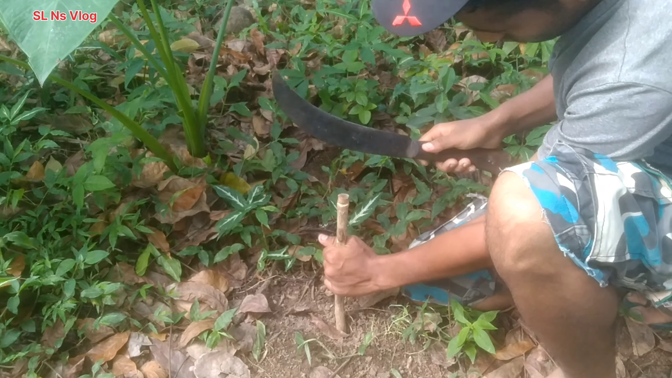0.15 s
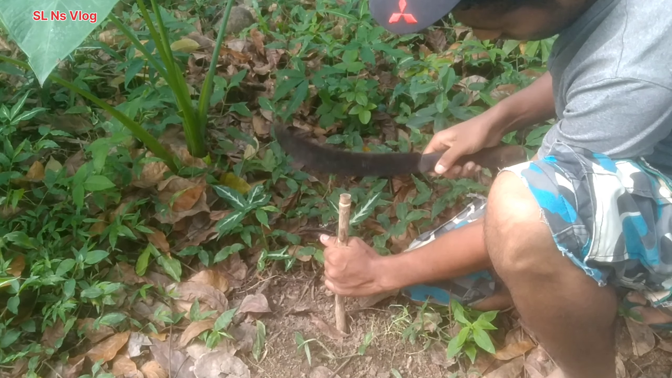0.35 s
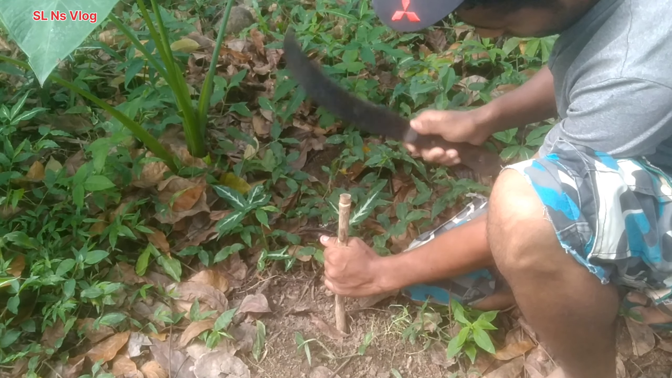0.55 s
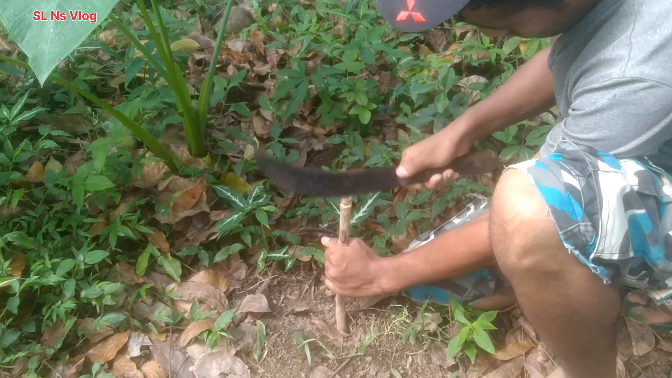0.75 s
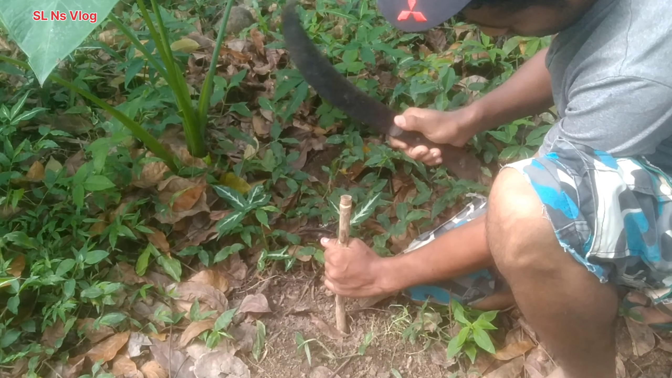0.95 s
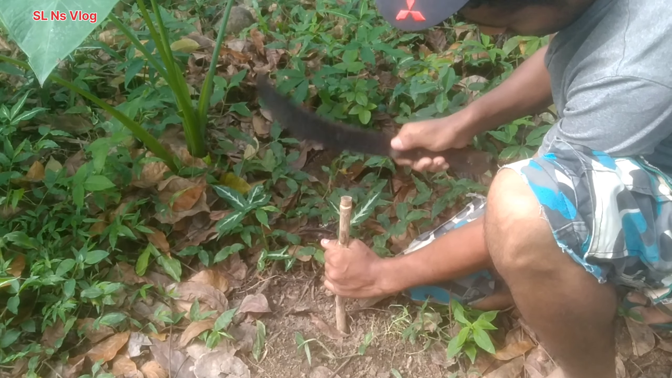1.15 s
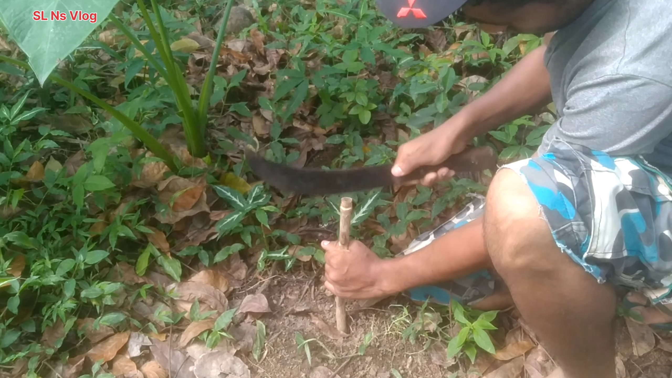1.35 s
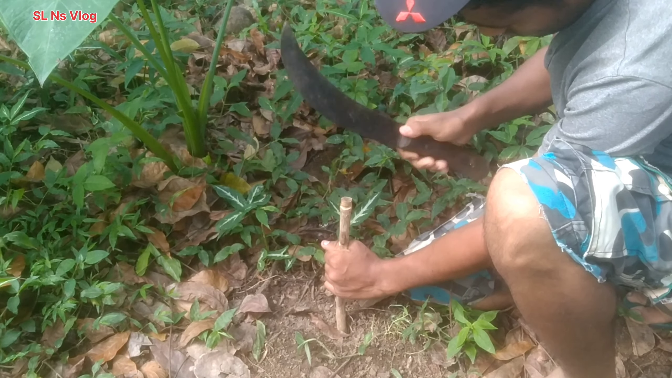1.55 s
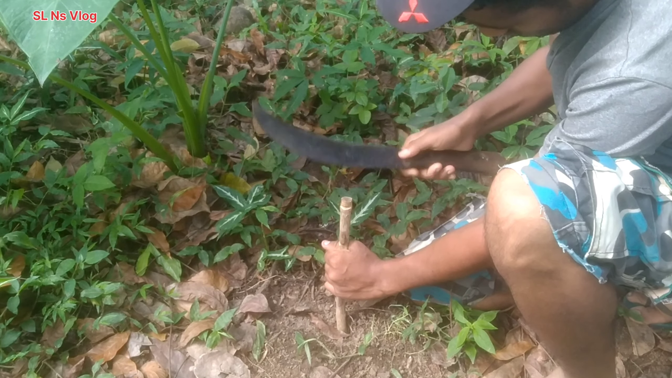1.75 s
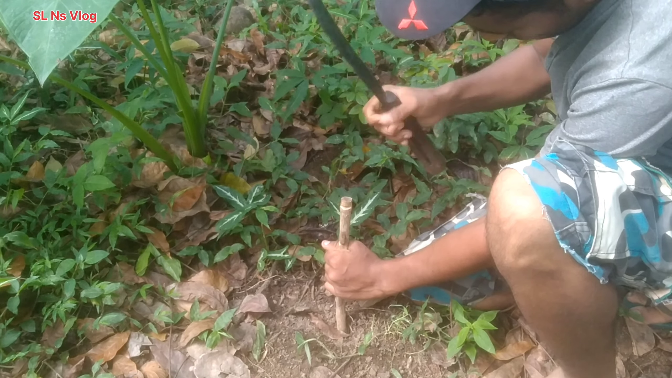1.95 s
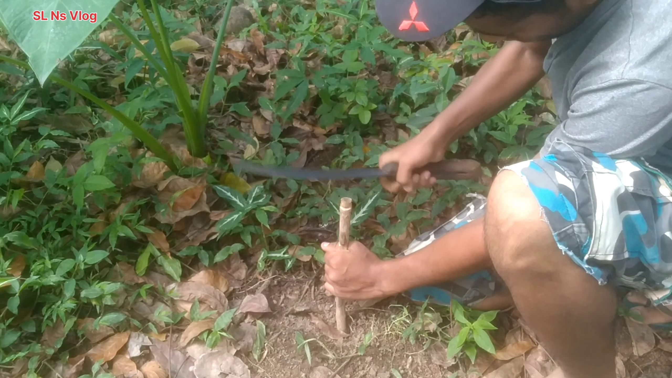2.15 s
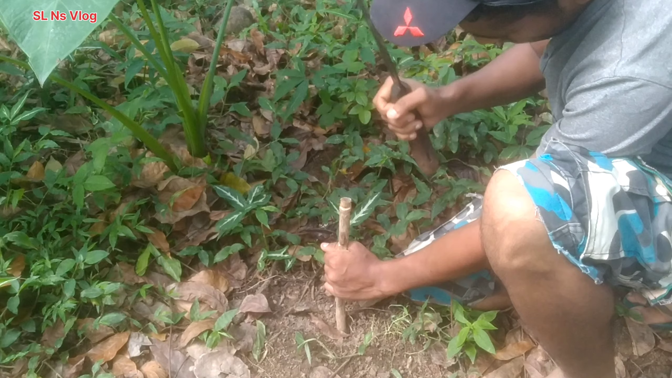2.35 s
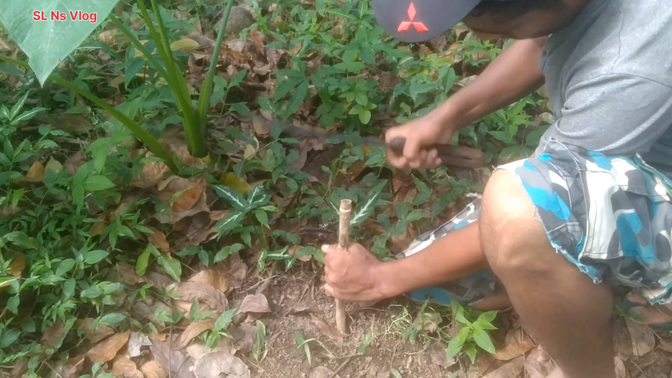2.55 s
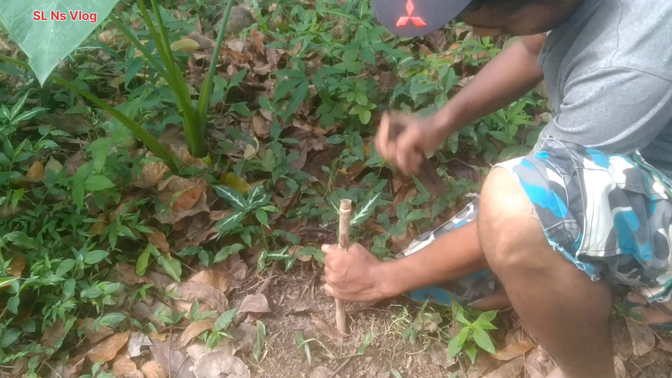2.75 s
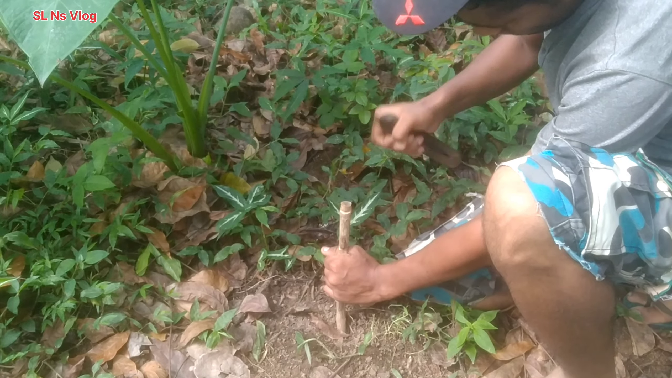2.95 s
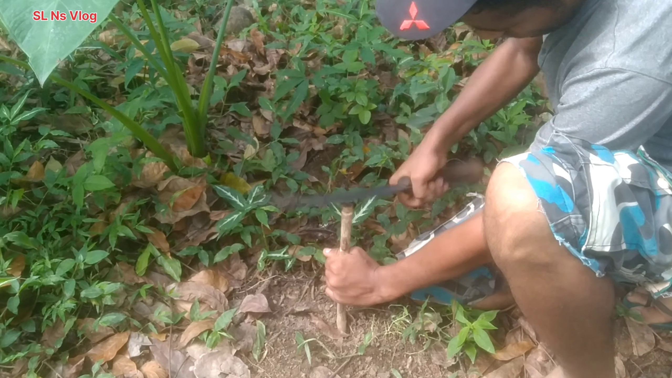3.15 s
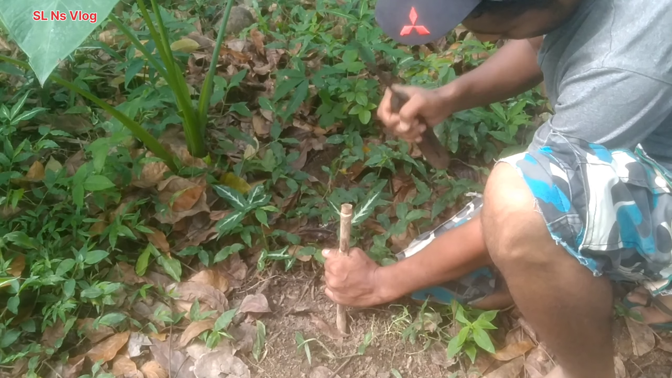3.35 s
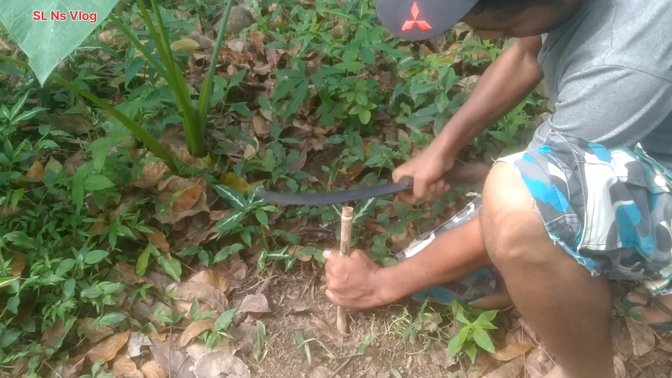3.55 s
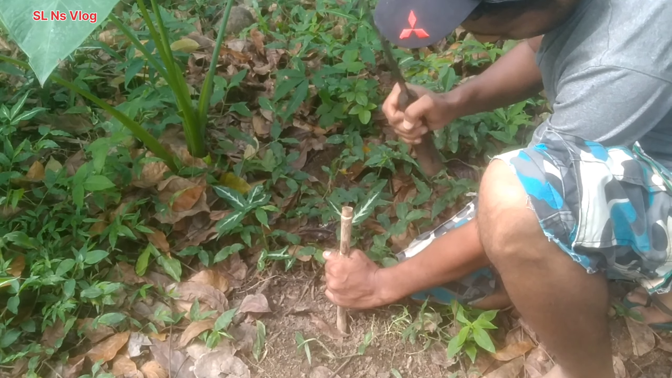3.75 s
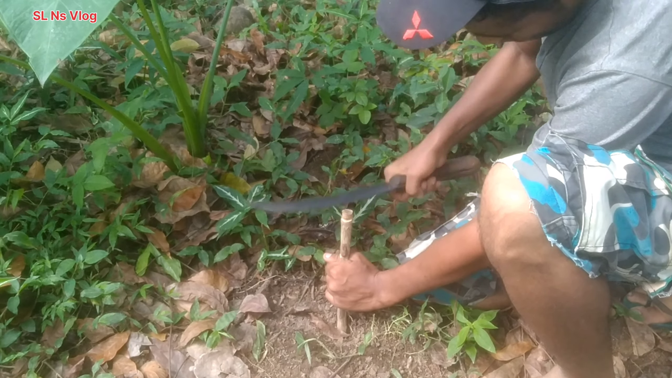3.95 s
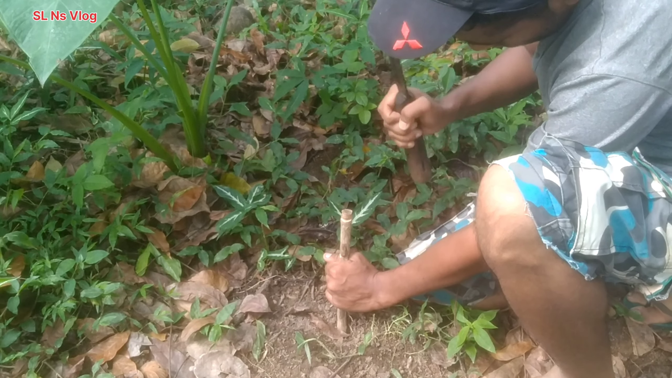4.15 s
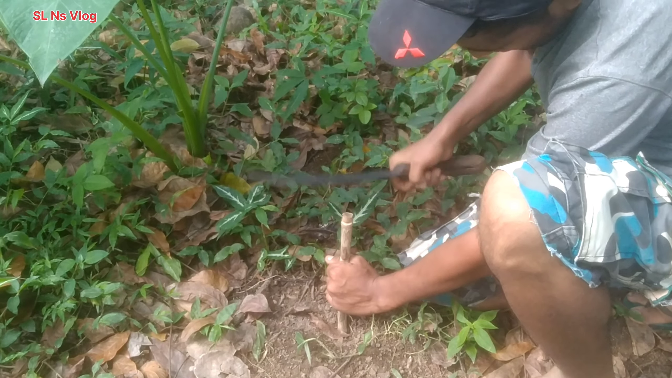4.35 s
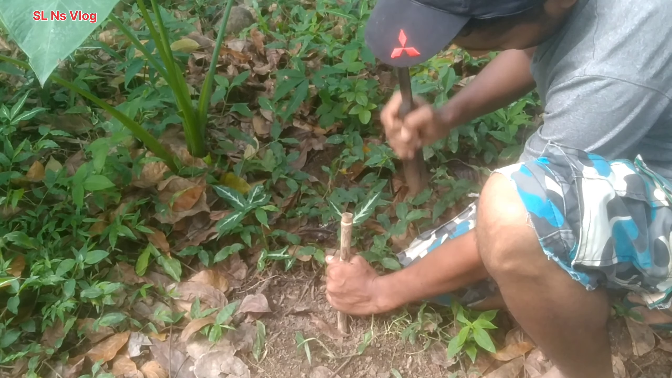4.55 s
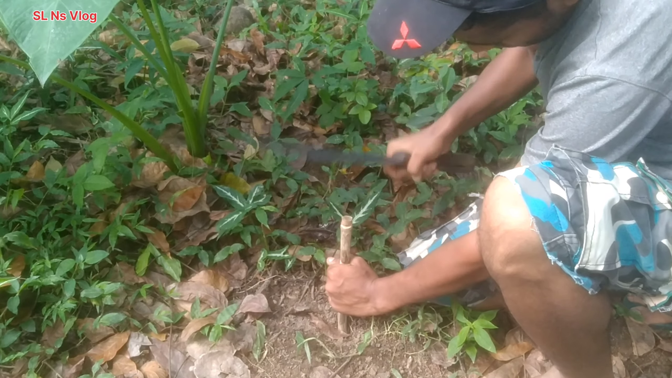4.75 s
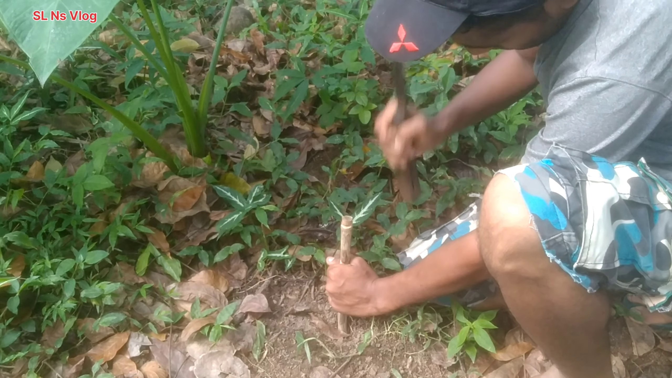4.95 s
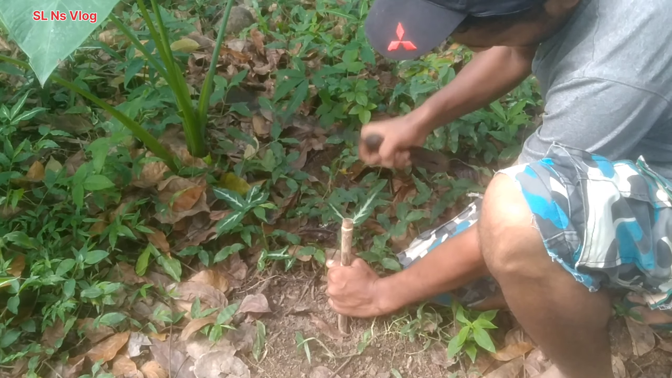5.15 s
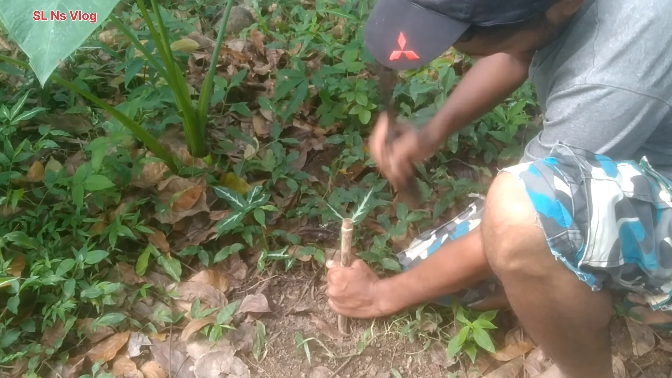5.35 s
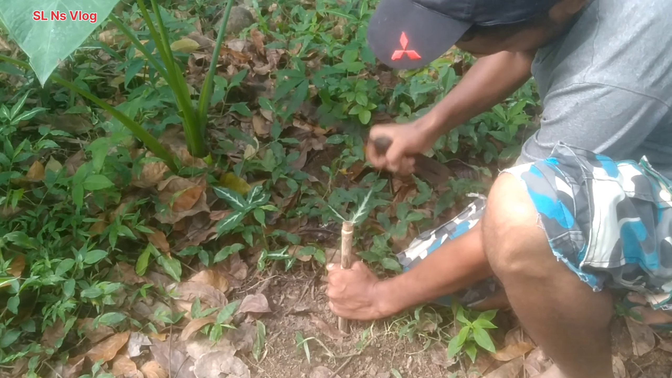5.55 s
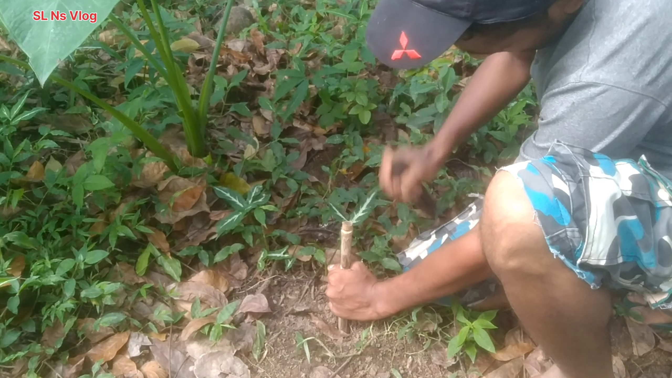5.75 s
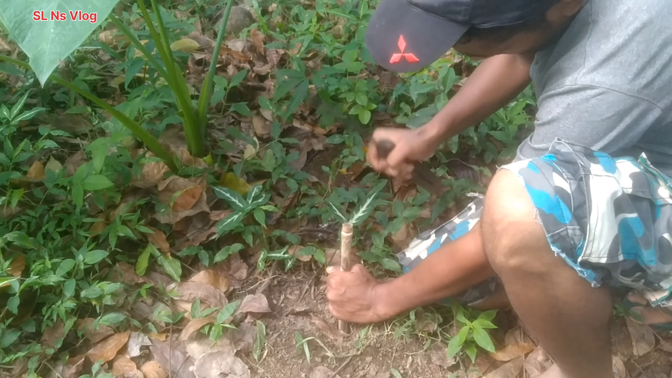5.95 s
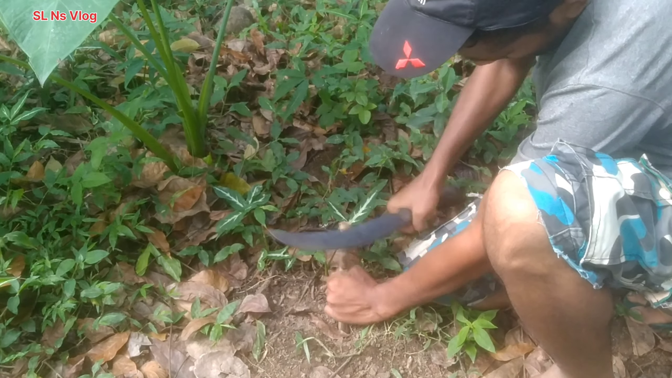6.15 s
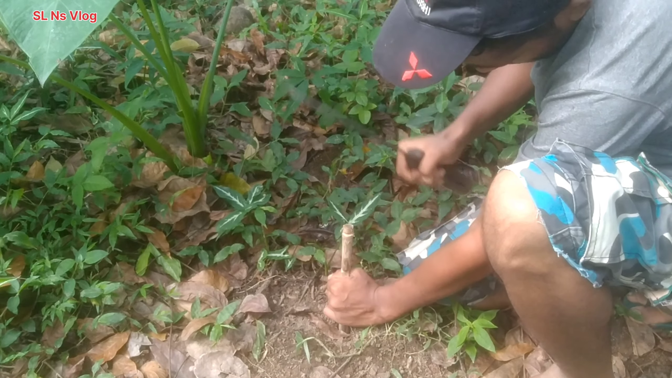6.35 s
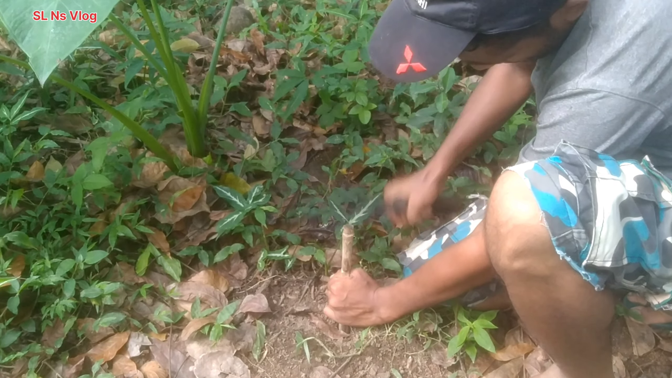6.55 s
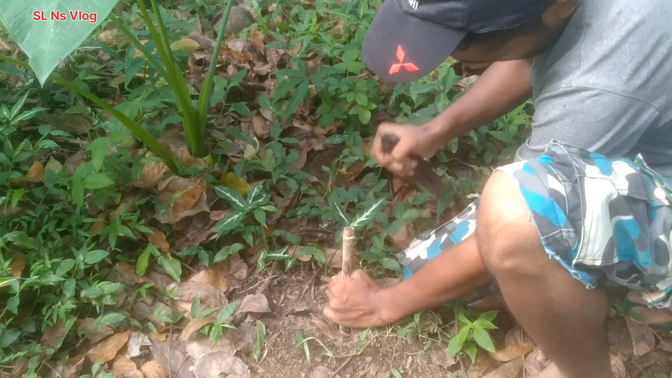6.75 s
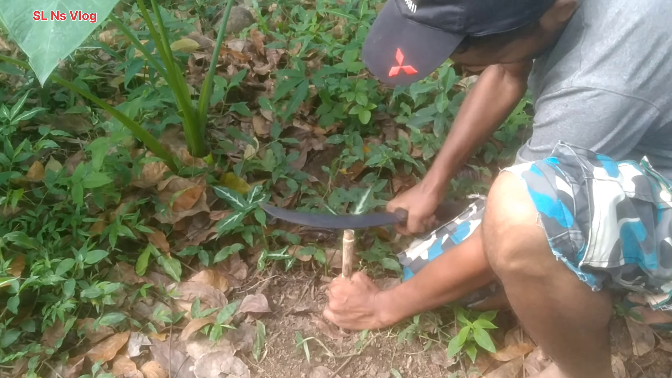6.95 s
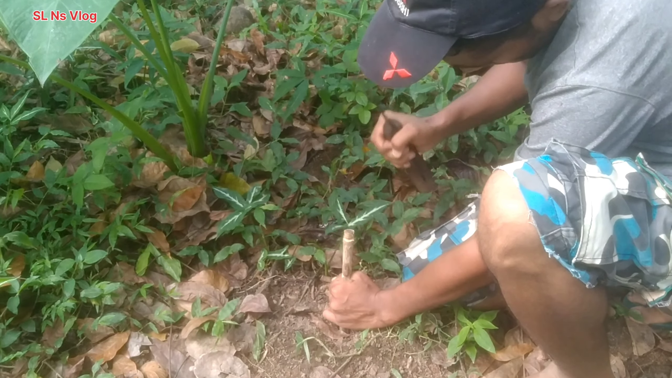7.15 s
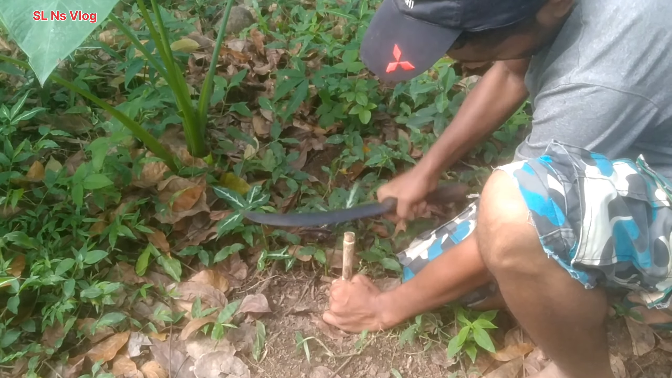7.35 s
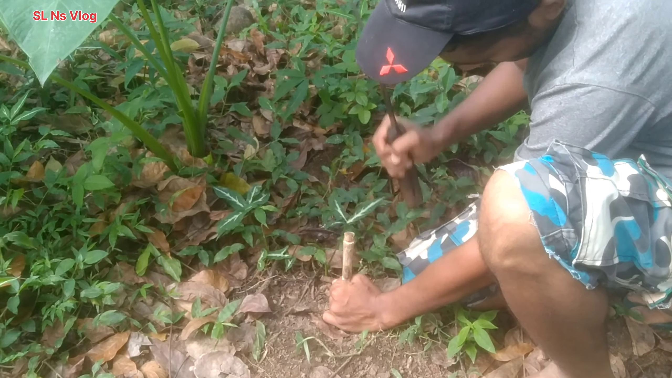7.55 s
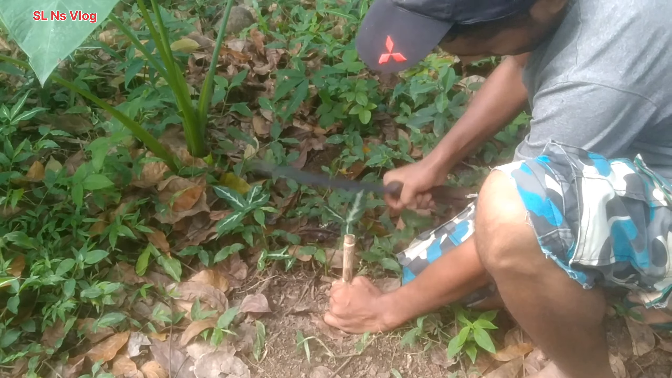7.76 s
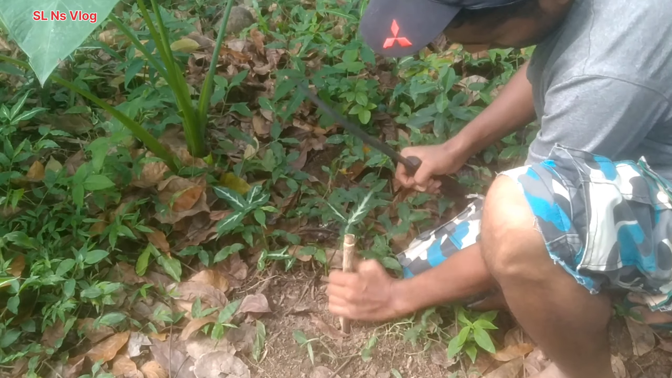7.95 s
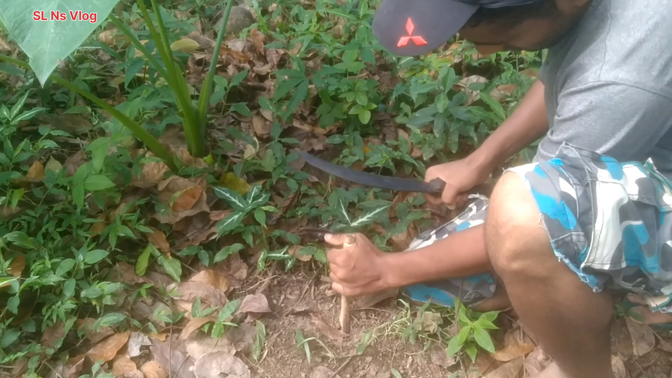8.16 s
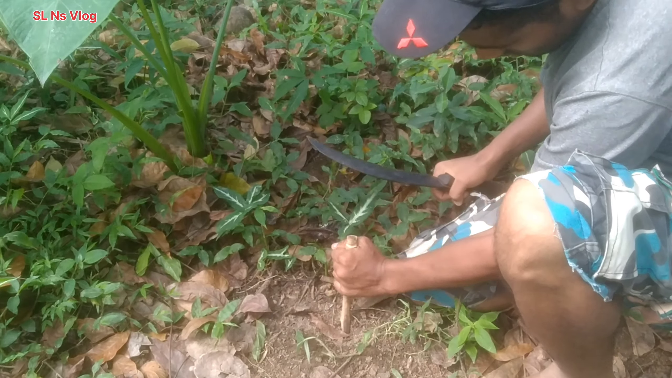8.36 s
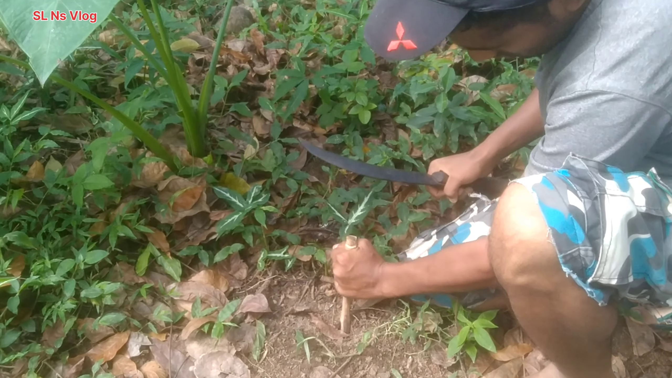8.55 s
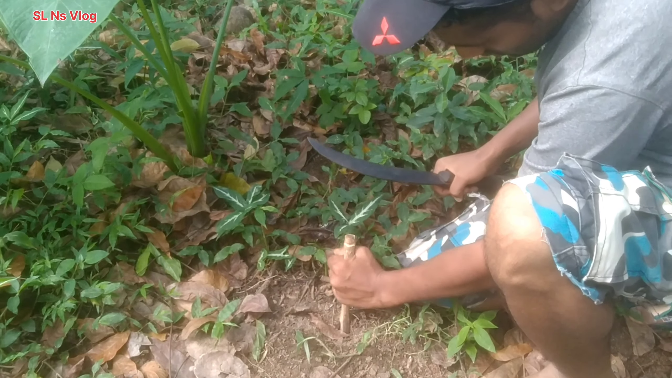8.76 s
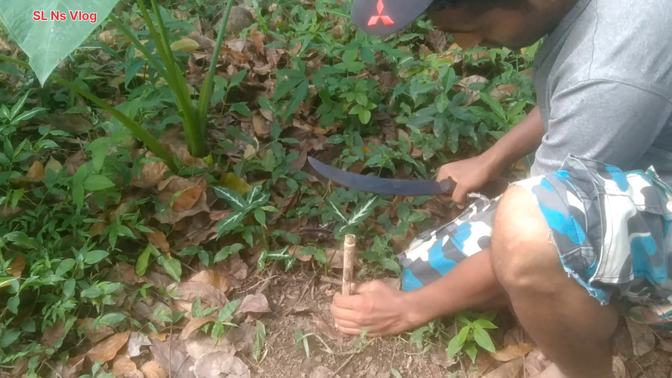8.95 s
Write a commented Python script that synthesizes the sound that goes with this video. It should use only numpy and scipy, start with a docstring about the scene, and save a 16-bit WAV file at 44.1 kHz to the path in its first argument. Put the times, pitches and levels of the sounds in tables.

```python
"""Hiss over low rumble, with a few dry ticks; then the flat of a machete drives a thin stake into forest soil.
Three light taps come first, then sixteen full blows; the rumble is stronger while the arm swings.
Each blow cracks in the wood (noise bursts through resonances), thumps the ground (one pressure pull) and
rings the blade (decaying sines); leaves and trunks scatter it back as decaying bands of noise.
Strong bass peaks duck the recorder's gain for a moment, so the forest's answer swells when it recovers."""
import sys
import numpy as np
from scipy import signal
from scipy.fft import rfft, irfft
from scipy.io import wavfile
from scipy.ndimage import uniform_filter1d, minimum_filter1d

SR = 44100
rng = np.random.default_rng(int(sys.argv[2]) if len(sys.argv) > 2 else 0)


def store_wav(level_fs):
    """Save 16-bit WAV to argv[1]."""
    pcm = np.round(np.clip(np.atleast_2d(level_fs), -1, 1) * 32767)
    wavfile.write(sys.argv[1], SR, pcm.T.astype(np.int16))


N = 400869

# Blows. Each row: start in seconds, force of the swing in dB, level of the direct wood crack in dB
# re what the force gives, sinking of the stake in dB, ring of the blade in dB, pitch of the struck spot in Hz.
BLOW_ROWS = [(0.8462, -14, 2.5, -38, -28, 2200), (1.1441, -18, .5, -41, -39, 1780),
             (1.424, -16, 1.5, -42, -27, 2200), (2.1934, -4.5, -2, -19, -3, 2140),
             (2.5567, 0, 4.5, -3.5, 1, 2460), (2.8964, 0, 5, -4, -7, 2460), (3.2448, 0, -.5, 0, -10, 2530),
             (3.6036, 0, 2.5, -4, 0, 1720), (3.971, 0, 2, -5, -4, 2655), (4.3551, 0, .5, -7.5, -10, 2980),
             (4.726, .5, -.5, -.5, -13, 2850), (5.1119, 0, -.5, -6.5, -8, 2090),
             (5.497, .5, -5.5, -4, -10, 2380), (5.8868, -.5, -1, -6, -4, 2430),
             (6.251, .5, 1, -1, -11, 2640), (6.6647, -.5, 1, -9, 1, 2420), (7.0331, 0, 1.5, -8, 1.5, 2637),
             (7.3865, 1, -7, -11.5, -1, 2460), (7.7266, .5, .5, -3.5, 3, 2400)]
# Where thud, knock, crack and snap of the wood sit, in Hz.
WOOD_COLOUR_HZ = [350, 1350, 3000, 7500]
# Thud, knock, crack and snap; a harder swing is brighter.
# Each row: level at full force in dB, slope in dB per dB of force.
WOOD_RULE = [(11, .4), (14.8, 1.05), (16.3, 1.08), (8.6, 1.55)]


def from_db(db):
    """Decibels to amplitude gain."""
    return 10 ** (np.asarray(db) / 20)


def unit_energy(x):
    """Scale to the energy of a click of height 1."""
    return x / np.sqrt(np.sum(x ** 2) + 1e-20)


def at_hz(hz, points_hz, values):
    """Interpolate values along a log-frequency axis."""
    return np.interp(np.log(hz), np.log(points_hz), values)


def follow(rule, control_db):
    """Levels in dB that each follow one control with a slope of their own."""
    full_db, slope = np.transpose(rule)
    return full_db + slope * control_db


def butter(x, hz, kind, order=2):
    """Causal Butterworth filter."""
    sos = signal.butter(order, hz, kind, fs=SR, output="sos")
    return signal.sosfilt(sos, x)


def resonate(x, hz, width_hz):
    """One two-pole resonance with gain 1 on top."""
    r = np.exp(-np.pi * width_hz / SR)
    zeros = np.array([1, 0, -1]) * (1 - r * r) / 2
    poles = [1, -2 * r * np.cos(2 * np.pi * hz / SR), r * r]
    return signal.lfilter(zeros, poles, x)


def narrow_noise(count, hz, width_hz):
    """A blurred tone of rms 1: noise through the same resonance twice."""
    once = resonate(rng.standard_normal(count), hz, width_hz)
    blur = resonate(once, hz, width_hz)
    return blur / blur.std()


def fade(t, t60_s):
    """Exponential decay, 60 dB down after t60_s."""
    return np.exp(-np.log(1000) * t / t60_s)


def add(track, start_s, sound):
    """Mix a sound into the track, cut at the track's end."""
    at = int(start_s * SR)
    track[at:at + len(sound)] += sound[:len(track) - at]


def background(rumble_hz=70):
    """Still air and microphone hiss as shaped noise; low rumble of air stirred by the swinging arm."""
    # Each row: frequency in Hz, level in dB re white noise of rms 1.
    floor_points = [(20, -36), (48, -34), (80, -45), (170, -56), (280, -68), (700, -67), (1800, -72),
                    (4000, -80), (5700, -83), (6900, -67), (8300, -86), (10000, -75), (11500, -85),
                    (15500, -80)]
    # Each row: time in seconds, rms of the rumble in dB.
    stirred_points = [(1.9, -75), (2.5, -58), (7.9, -59.5), (8.5, -76.5)]
    hz = np.maximum(np.fft.rfftfreq(N, 1 / SR), 1)
    floor_gain = from_db(at_hz(hz, *np.transpose(floor_points)))
    still = irfft(rfft(rng.standard_normal(N)) * floor_gain, N)
    rumble = butter(rng.standard_normal(N), rumble_hz, "low")
    rumble_db = np.interp(np.arange(N) / SR, *np.transpose(stirred_points))
    return still + from_db(rumble_db) * rumble / rumble.std()


def crush(t, rise_s=0.00013, t60_s=0.012):
    """Fibres give way in tiny fractures: a noise burst a few milliseconds long, of unit energy."""
    envelope = (1 - np.exp(-t / rise_s)) * fade(t, t60_s) + 1e-18
    return unit_energy(rng.standard_normal(len(t)) * envelope)


def litter(width_hz=4500):
    """Faint snaps, as of dry leaves: short bursts through one broad resonance."""
    # Each row: start in seconds, level of the burst ahead of the resonance in dB, resonance in Hz.
    tick_rows = [(0.226, -40.5, 3430), (0.671, -43, 3880), (1.34, -48, 6000), (3.447, -31, 14400),
                 (8.996, -40.5, 5000)]
    t, out = np.arange(SR // 20) / SR, np.zeros(N)
    for start_s, db, hz in tick_rows:
        tick = resonate(crush(t, t60_s=0.014), hz, width_hz)
        add(out, start_s, from_db(db) * tick)
    return out


def stake(t, colour_db, spot_hz, spot_width_hz=170, spot_db=4.5):
    """The contact rings the stake's modes, damped by hand and soil, and one set by the spot struck."""
    # Each row: frequency in Hz, width in Hz, level re the wood's colour in dB.
    stake_modes = [(160, 110, 3), (420, 420, -7), (680, 160, -9.5), (900, 200, -5.5), (1332, 87, -0.5),
                   (1807, 150, 4), (2580, 240, 1), (2750, 150, -1.5), (3330, 490, -1.5), (4740, 940, -5.5),
                   (6930, 520, -1.5), (8130, 410, 3), (10400, 1400, -9), (15300, 1400, 3.5)]
    out = 0
    for hz, width_hz, db in stake_modes + [(spot_hz, spot_width_hz, spot_db)]:
        # a wider mode takes up more of the contact's energy
        share = np.sqrt(np.pi * width_hz / SR)
        level = from_db(db + at_hz(hz, WOOD_COLOUR_HZ, colour_db)) * share
        out = out + level * unit_energy(resonate(crush(t), hz, width_hz))
    return out


def blade(t, ring_db, detune_hz=8, shimmer_db=-11, shimmer_width_hz=130, shimmer_t60_ratio=1.5):
    """Thin steel rings on; the grip shifts its modes, and their reflections blur into a longer shimmer."""
    # Each row: frequency in Hz, level re the ring level in dB, t60 in seconds.
    blade_modes = [(947, -3, .1), (1674, 2, .09), (12065, -7, .19), (13682, -3, .2), (15045, -3, .14)]
    # Where the low, high and top ring levels sit, in Hz.
    ring_points_hz = [6000, 12060, 13680]
    out = 0
    for hz, db, t60_s in blade_modes:
        shifted_hz = hz + detune_hz * rng.standard_normal()
        tone = fade(t, t60_s) * np.sin(2 * np.pi * shifted_hz * t)
        blur = narrow_noise(len(t), hz, shimmer_width_hz)
        shimmer = from_db(shimmer_db) * fade(t, t60_s * shimmer_t60_ratio) * blur
        out = out + from_db(db + at_hz(hz, ring_points_hz, ring_db)) * (tone + shimmer)
    return out


def thump(t, rise_s, t60_s=0.055, low_cut_hz=3):
    """The stake sinks: one pull of pressure and a slow swing back."""
    pull = -(1 - np.exp(-t / rise_s)) * fade(t, t60_s)
    return butter(pull, low_cut_hz, "high", order=1)


def woody_echo(t, spot_hz, spot_db=-52, body_hz=1350, body_db=-61.5, width_hz=260, t60_s=0.77):
    """The stake's strongest tones stand out of the forest's answer as fading narrow noise."""
    spot = from_db(spot_db) * narrow_noise(len(t), spot_hz, width_hz)
    body = from_db(body_db) * narrow_noise(len(t), body_hz, width_hz / 2)
    return (spot + body) * fade(t, t60_s)


def hammering(thump_db=-6, sink_rise_s=.00025, drag_s_per_db=.0001):
    """Every blow sounds in wood, steel and ground; a stake that sinks less starts more slowly."""
    # Low, high and top ring. Each row: level when ringing freely in dB, slope in dB per dB of ring.
    steel_rule = [(-38, .1), (-20.5, 1.36), (-25.5, .92)]
    t, out = np.arange(2 * SR // 3) / SR, np.zeros(N)
    for start_s, force_db, crack_db, sink_db, ring_db, spot_hz in BLOW_ROWS:
        wood = stake(t, follow(WOOD_RULE, force_db) + crack_db, spot_hz)
        echo = from_db(force_db) * woody_echo(t, spot_hz)
        steel = blade(t, follow(steel_rule, ring_db))
        rise_s = sink_rise_s + drag_s_per_db * abs(sink_db)
        ground = from_db(sink_db + thump_db) * thump(t, rise_s)
        add(out, start_s, wood + echo + steel + ground)
    return out


def linger(energy, rise_s, t60_s):
    """Spread each parcel of energy over a quick rise and an exponential decay."""
    # energy is amplitude squared and decays twice as fast, hence 2 / SR
    for r in (np.exp(-1 / (rise_s * SR)), fade(2 / SR, t60_s)):
        energy = signal.lfilter([1 - r], [1, -r], energy + 1e-18)
    return energy


def forest(send_db=-2.3, leaves_rise_s=.001, leaves_t60_s=0.14, trunks_rise_s=0.0044):
    """Countless paths overlap into a smooth wash of noise: quick from near leaves, long from trunks."""
    # Each row: frequency in Hz, near leaves in dB and far trunks in dB re the blow sent,
    # t60 of the trunks in seconds.
    return_rows = [(250, -14, -31, 0.27), (544, -20.5, -26, 1.15), (1080, -16.5, -22, 1.2),
                   (1350, -13, -21, 1.4), (1900, -13.5, -21.5, 1.21), (2400, -7, -15.5, 0.66),
                   (3300, -14, -17.5, 0.69), (4600, -10.5, -20.5, 0.76), (6200, -7.5, -13.5, 0.65),
                   (7900, -5, -11.5, 0.66), (8900, -9.5, -29, 0.97), (12500, -13, -20.5, 0.69),
                   (15300, -10, -17.5, .58)]
    starts = [int(start_s * SR) for start_s, *_ in BLOW_ROWS]
    # the answer follows the force of the swing, wherever the blade lands
    colours_db = [follow(WOOD_RULE, force_db) + send_db for _, force_db, *_ in BLOW_ROWS]
    points_hz, *columns = np.transpose(return_rows)
    edges_hz = np.geomspace(200, 17000, 27)
    # two noises take turns, so neighbouring bands differ
    white, out = rng.standard_normal((2, N)), 0
    for k, (low_hz, high_hz) in enumerate(zip(edges_hz, edges_hz[1:])):
        hz = np.sqrt(low_hz * high_hz)
        near_db, far_db, t60_s = [at_hz(hz, points_hz, c) for c in columns]
        energy = np.zeros(N)
        energy[starts] = from_db([at_hz(hz, WOOD_COLOUR_HZ, c) for c in colours_db]) ** 2
        near = from_db(near_db) ** 2 * linger(energy, leaves_rise_s, leaves_t60_s)
        far = from_db(far_db) ** 2 * linger(energy, trunks_rise_s, t60_s)
        out = out + np.sqrt(near + far) * butter(white[k % 2], [low_hz, high_hz], "band")
    return out


def scene():
    """One microphone, the same in both channels."""
    mono = background() + litter() + hammering() + forest()
    return np.array([mono, mono])


def gain_control(x, sense_hz=150, threshold_db=-28, most_db=8.5, hold_s=.093, release_s=.002):
    """A strong bass peak turns the gain down at once; it is held there, then let go."""
    level_db = 20 * np.log10(np.abs(butter(x, sense_hz, "low")) + 1e-9)
    duck_db = np.clip(2 * (level_db - threshold_db), 0, most_db)
    # only a fresh rise starts the hold
    rise_db = duck_db * (duck_db > np.roll(duck_db, 1))
    hold = int(hold_s * SR) | 1
    # running maximum over the past hold
    held_db = -minimum_filter1d(-rise_db, hold, origin=hold // 2)
    keep = np.exp(-1 / (release_s * SR))
    released_db = signal.lfilter([1 - keep], [1, -keep], held_db)
    held_db = np.maximum(held_db, released_db)
    # act 2 ms ahead of the peak, glide over 1 ms
    ahead, glide = int(.002 * SR), int(.001 * SR)
    return x * from_db(-uniform_filter1d(np.roll(held_db, -ahead), glide))


def record(dry, cutoff_hz=16000):
    """Gain control, then a steep elliptic low-pass cuts the top."""
    ducked = np.array([gain_control(channel) for channel in dry])
    low_pass = signal.ellip(10, .1, 70, cutoff_hz, fs=SR, output="sos")
    return signal.sosfilt(low_pass, ducked)


dry = scene()
out = record(dry)
store_wav(out)
```